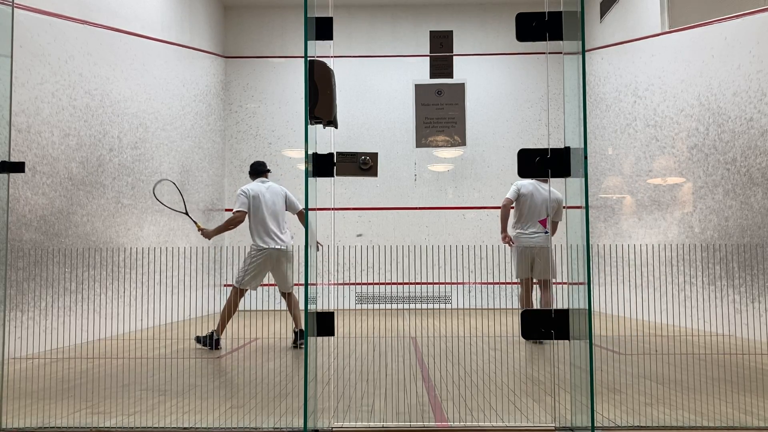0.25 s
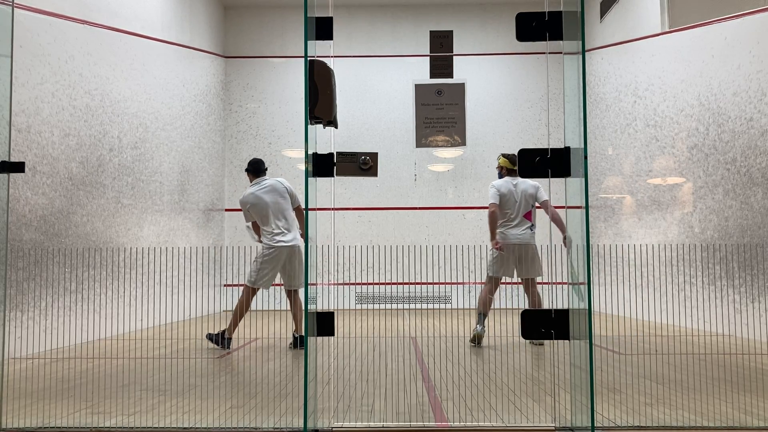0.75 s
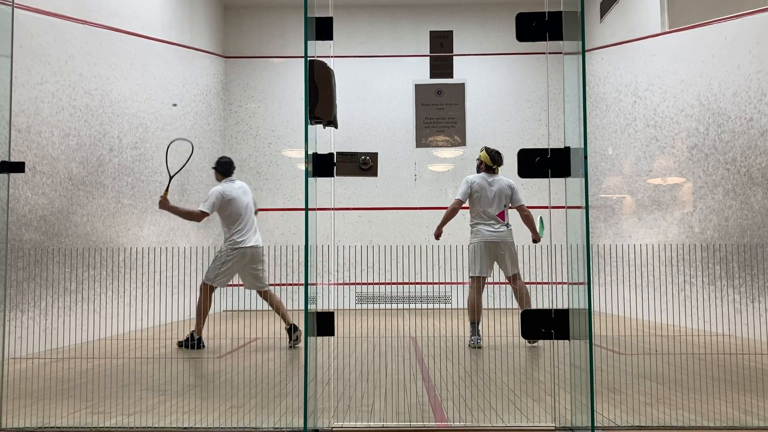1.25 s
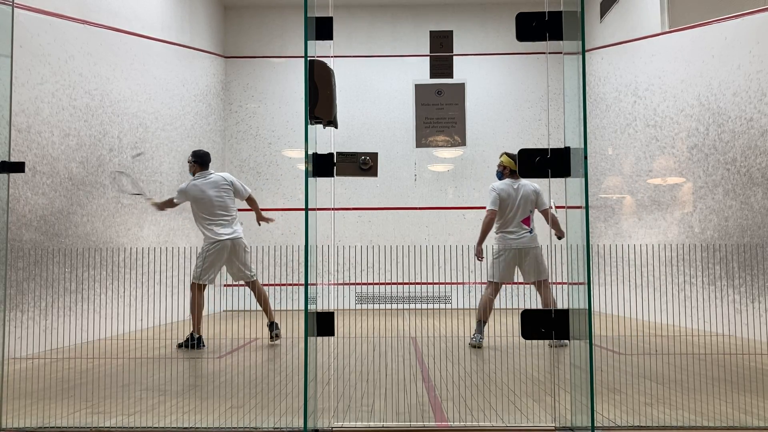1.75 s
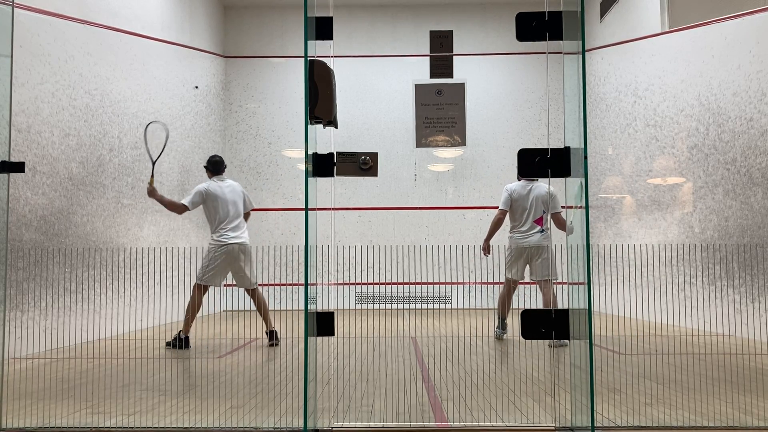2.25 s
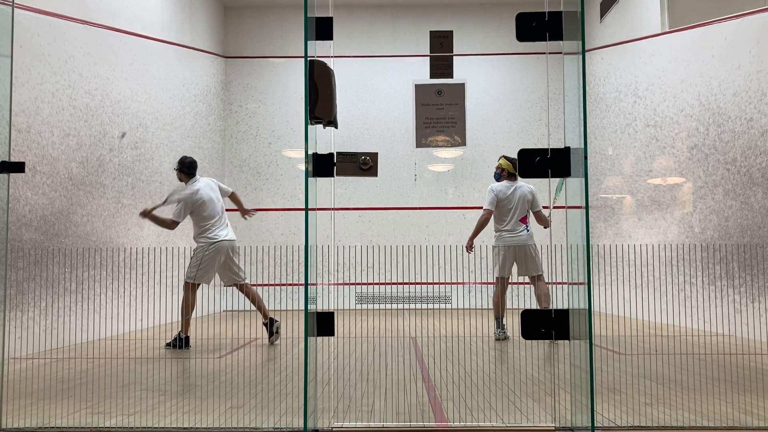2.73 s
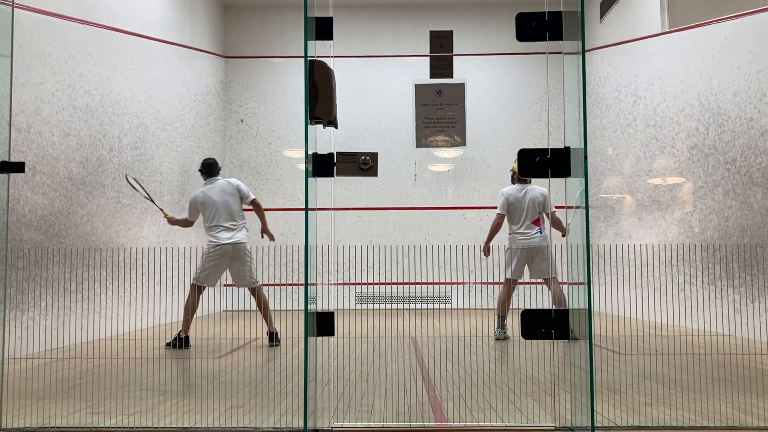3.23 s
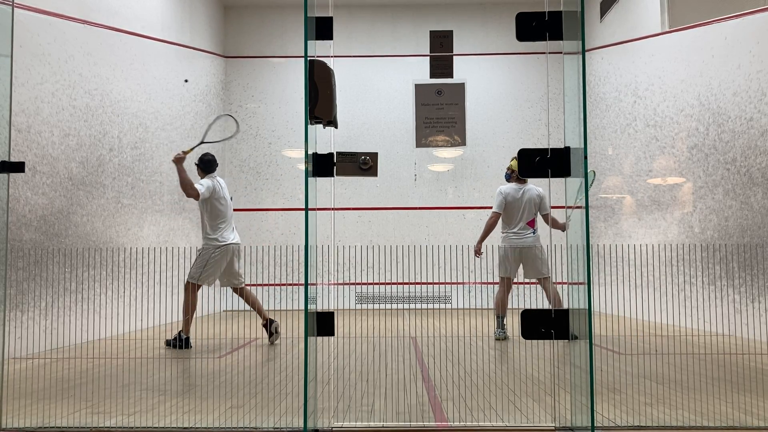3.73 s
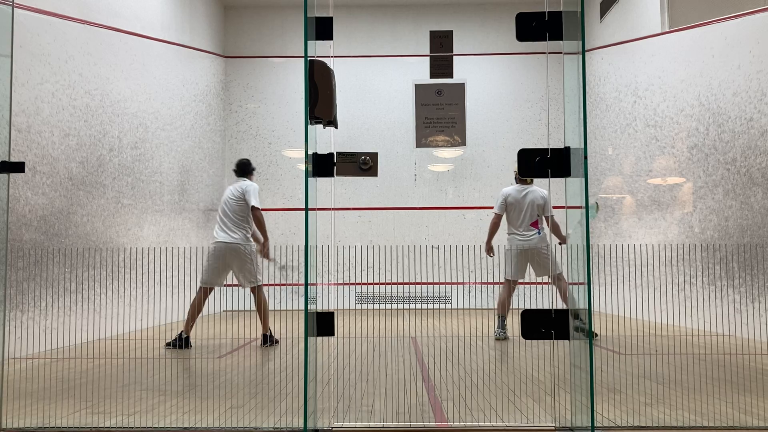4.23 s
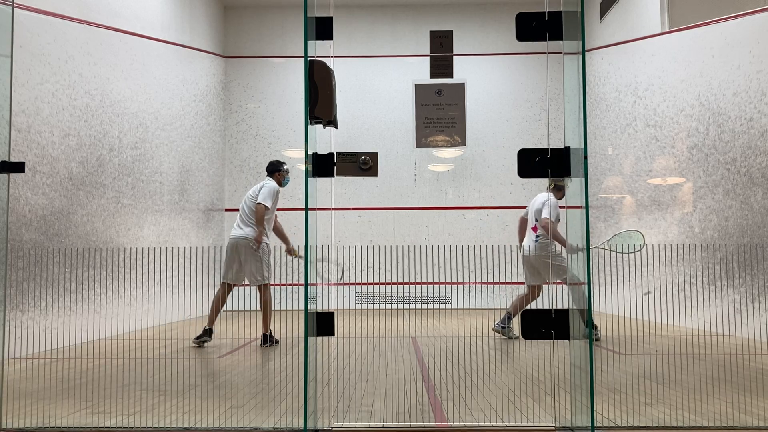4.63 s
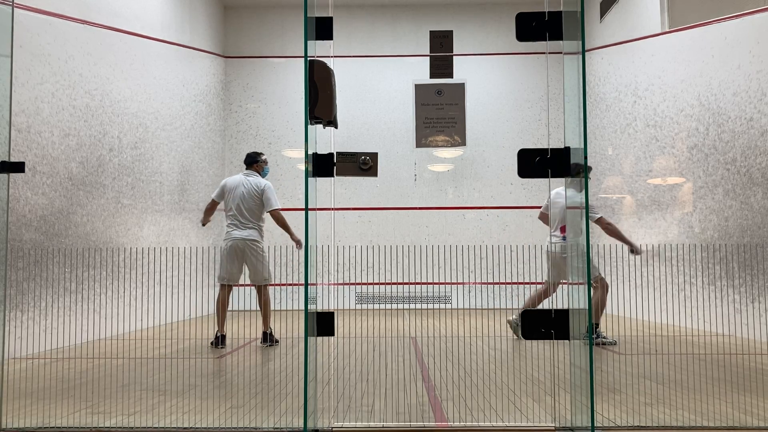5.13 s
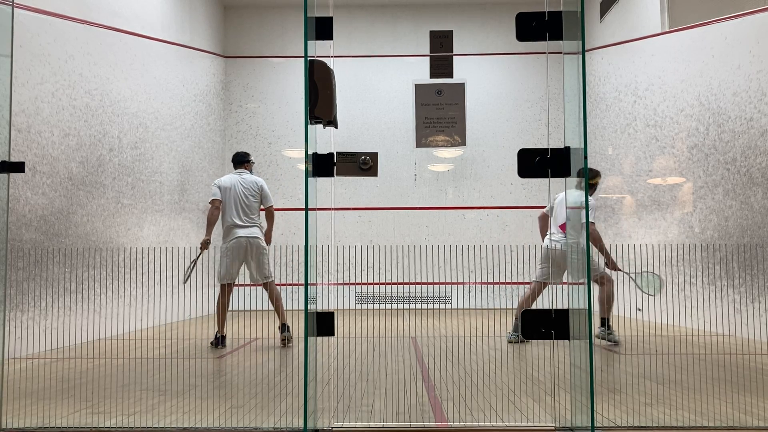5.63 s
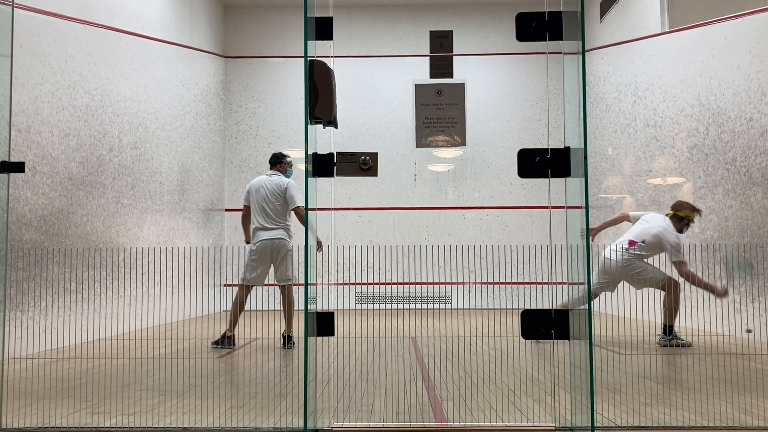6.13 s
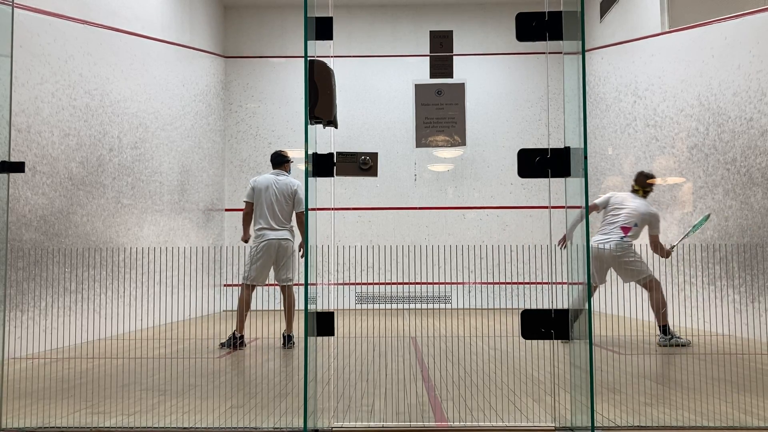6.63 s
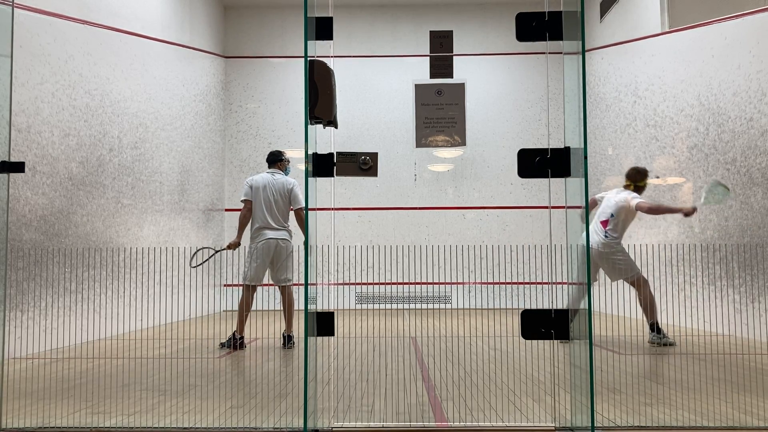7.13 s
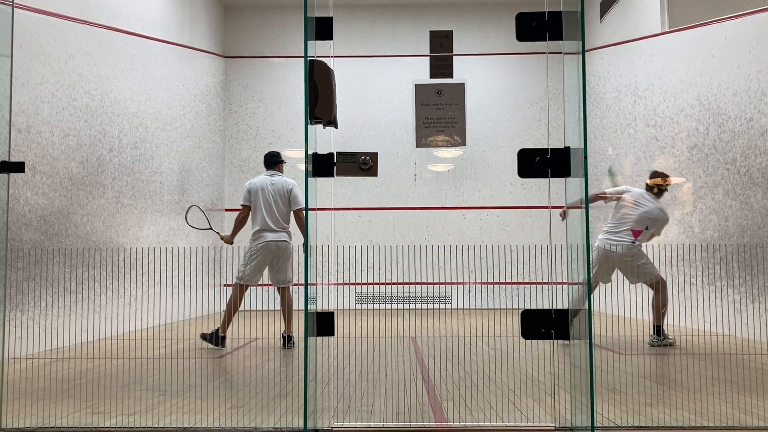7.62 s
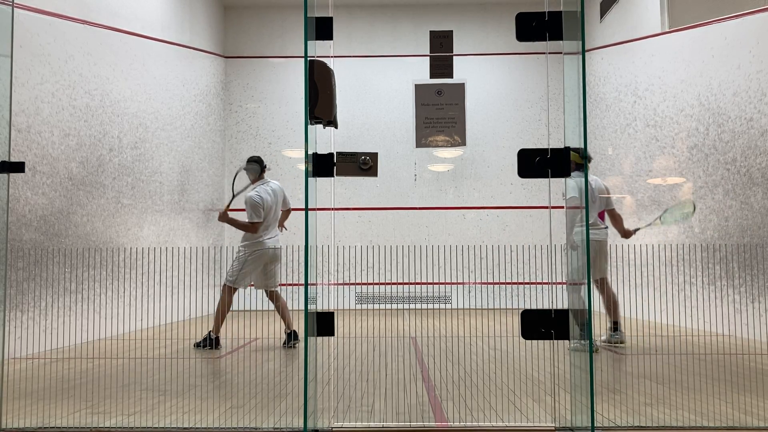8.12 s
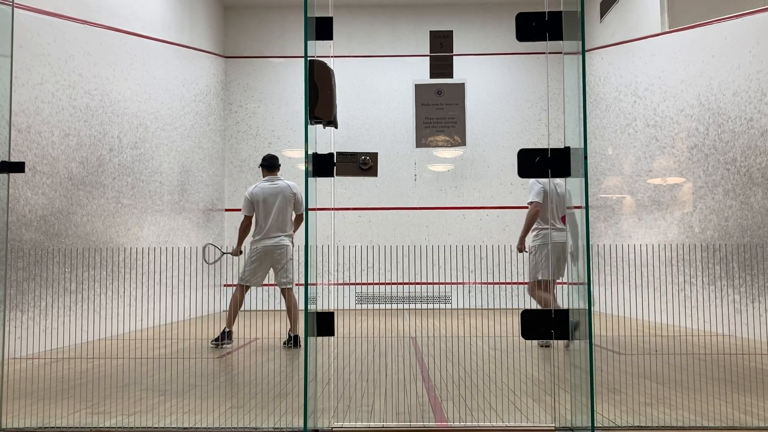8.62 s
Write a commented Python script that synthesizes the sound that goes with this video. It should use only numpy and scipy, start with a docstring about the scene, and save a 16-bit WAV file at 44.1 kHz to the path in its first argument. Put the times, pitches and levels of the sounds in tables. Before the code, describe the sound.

Two players warm up in a reverberant squash court, racquet slaps answered by hollow ball pops off the front wall, one shot booming into the metal tin.

```python
"""Squash court, heard from behind the glass back wall, as two players warm up.
Coloured clicks through a simulated court echo make each racquet stroke and the ball's answer on the
front wall; one low drive crashes into the tin with a thump, a boom and a rattle.
Strings linger as wavering tones; shaped noise and gliding tones are the swishes, scuffs and squeaks.
The bare court rings after every blow, and ventilation hums underneath as filtered noise and tones."""
import sys
import numpy as np
from scipy import signal
from scipy.fft import rfft, irfft, next_fast_len
from scipy.io import wavfile
from scipy.ndimage import uniform_filter1d

SR = 44100
rng = np.random.default_rng(int(sys.argv[2]) if len(sys.argv) > 2 else 0)


def bounce(signal):
    """Save signal as a 16-bit WAV file at the path given by the first command-line argument."""
    frames = np.transpose(np.atleast_2d(signal))
    limited = np.clip(frames, -1, 1)
    pcm = np.round(limited * 32767).astype(np.int16)
    wavfile.write(sys.argv[1], SR, pcm)


N = 391149
SIZE = 2 ** 17  # FFT length of one event [samples]
HZ, T = np.fft.rfftfreq(SIZE, 1 / SR), np.arange(SIZE) / SR

# racquet strokes: (time [s], level [dB], force [0-1], crack of first arrivals [dB],
# hollow knock of first arrivals [dB], string pitch [Hz], string ping [dB], lingering string ring [dB],
# delay of front wall echo [s])
STROKES = [(-.09, -9, 0.95, 9, 0, 1462, -1, -31, .042),
           (.640, -13.5, 0.43, 17.5, 10.5, 1295, 5, -43, 0.053),
           (1.794, -12.5, 0.26, -2, -19, 1260, 3.5, -45, 0.039),
           (2.999, -11.5, 0.23, 4.5, 10, 1280, 4.5, -44, 0.041),
           (4.127, -9, 0.71, -7, 11, 1264, 1, -48, .047),
           (5.212, -8.5, 0.94, 7, -1.5, 1430, -0.5, -37, 0.038),
           (6.318, -11, 0.051, 18.5, -4, 1440, 5, -46, .04),
           (7.522, -11, 0.92, 14.5, 5.5, 1460, 0, -39, .04),
           (8.322, -13.5, 0.27, 0, 10, 1266, 5, -41.5, 0.047)]
# resonances of the hollow ball: (frequency [Hz], width [Hz], lift [dB])
BALL_MODES = [(788, 63, -0.5), (1030, 102, 0), (2120, 80, -9.5)]
# spectrum of a gentle ball impact: (frequency [Hz], level [dB])
WALL_SOFT = [(60, -13), (180, -3.5), (300, -0.5), (440, -6), (620, -23), (900, -18.5), (1250, -17.5),
             (1650, -18), (2500, -27.5), (4000, -30), (6200, -37.5), (9500, -36), (13000, -43),
             (16000, -46.5)]
# first arrivals from mid-court: (delay [s], level [dB])
MID_PATHS = [(.0008, 21), (.004, 23), (.009, 13.5)]


def amp(db):
    """Decibels to gain."""
    return 10 ** (np.asarray(db) / 20)


def evened(x):
    """Scales to rms 1."""
    return x / np.sqrt(np.mean(x ** 2) + 1e-20)


def smoothed_noise(shape, first, second):
    """Gaussian noise averaged twice along its last axis."""
    once = uniform_filter1d(rng.standard_normal(shape), size=first)
    return uniform_filter1d(once, size=second)


def read(points, hz):
    """Joins (Hz, value) points on a log-frequency axis."""
    f, value = np.transpose(points)
    return np.interp(np.log(hz + 1), np.log(f + 1), value)


def add(mix, s, sound):
    """Mixes a stereo sound in at time s, which may lie before the start."""
    start = round(s * SR)
    sound = sound[:, max(-start, 0):]
    part = mix[:, max(start, 0):][:, :sound.shape[1]]
    part += sound[:, :part.shape[1]]


def treble(corner_hz=2500):
    """A shelf that rises from 0 in the bass to 1 in the treble."""
    return HZ ** 2 / (HZ ** 2 + corner_hz ** 2)


def blow(db, modes=()):
    """Spectrum of a causal (minimum-phase) click of the given colour, ringing in the given modes."""
    cepstrum = irfft(np.log(amp(db)))
    fold = 1 + np.sign(SIZE / 2 - np.arange(SIZE)) * (T > 0)
    click = np.exp(rfft(cepstrum * fold))
    ring = sum(amp(lift) / (1 + 2j * (HZ - hz) / width) for hz, width, lift in modes)
    return click * (1 + ring)


def court_tail(rise_s, hold_s, grain_db):
    """Reverberant noise that builds up, holds, then dies by band, uneven from beats and bunched echoes."""
    # decay of the court: (frequency [Hz], t60 [s])
    decay_times = [(80, 0.54), (160, 1.63), (240, 1.5), (500, 1.78), (900, 2.02), (1400, 2.09),
                   (2000, 1.375), (2800, 1.19), (4000, 1.085), (5500, 0.8), (7700, 0.69), (11000, 0.55),
                   (16000, 0.46)]
    beating_db, cluster_db = 2.6, 1.0
    t = T[:2 * SR]
    clusters = evened(uniform_filter1d(rng.standard_normal(len(t)), size=180))
    grain = amp(grain_db * rng.standard_normal(len(t)) + cluster_db * clusters)
    taps = evened(rng.standard_normal((2, len(t))) * grain)
    hz, when, z = signal.stft(taps, SR, nperseg=512)
    # above the bass, narrow resonances swell and fade between the parallel walls
    across_bands = uniform_filter1d(rng.standard_normal(z.shape[1:]), size=2, axis=0)
    beats = evened(uniform_filter1d(across_bands, size=7, axis=1))
    beats_db = beating_db * (np.clip(beats, -2, 2) - .4) * np.minimum(hz / 1400, 1)[:, None]
    # level holds while the sound first crosses the court
    decay_db = -60 * np.maximum(when - hold_s, 0) / read(decay_times, hz)[:, None]
    tail = signal.istft(z * amp(decay_db + beats_db), SR, nperseg=512)[1][:, :len(t)]
    return tail * (1 - np.exp(-t / rise_s))


def first_arrivals(paths, length, smear_s, solid):
    """Each arrival is a spike (solid: its ratio to the rest) and a noise burst, smeared by the glass."""
    first, brief = np.zeros((2, length)), T[:SR // 20]
    for delay, db in paths:
        arrival = rng.standard_normal((2, len(brief))) * np.exp(-brief / smear_s)
        spot = rng.choice(SR // 2000, size=2, replace=False)
        sign = rng.choice([-1, 1], size=2)
        arrival[[0, 1], spot] += solid * np.linalg.norm(arrival, axis=1) * sign
        add(first, delay, amp(db) * arrival / np.linalg.norm(arrival, axis=1, keepdims=True))
    return first


def court(paths, crack_db, knock_db=0, knock_hz=920, smear_s=0.0012, solid=0.26, rise_s=0.0023,
          hold_s=0.024, grain_db=3.):
    """One place's echo spectrum: coloured first arrivals plus the reverberant tail."""
    # colour of first arrivals against the tail, whose bass builds up late: (frequency [Hz], level [dB])
    first_colour = [(150, -1.5), (270, -5), (450, -2.5), (900, -1), (2000, 1.5), (4000, 1), (5400, -2.5),
                    (7000, 2.5), (8500, -1), (12000, 1)]
    tail = court_tail(rise_s, hold_s, grain_db)
    first = first_arrivals(paths, tail.shape[1], smear_s, solid)
    # a square blow arrives with a hollow knock, one that faces the microphone with a brighter crack
    knock = knock_db / (1 + ((HZ - knock_hz) / (0.19 * knock_hz)) ** 2)
    colour_db = read(first_colour, HZ) + knock + crack_db * treble(4400)
    return rfft(tail, SIZE) + rfft(first, SIZE) * amp(colour_db)


def ports(z, hz, lag_s=0.0002197, knee_hz=2300):
    """Two unrelated spectra become the microphone pair: alike in the bass, offset in phase in the treble."""
    # likeness of the two ports: (frequency [Hz], correlation [-1 to 1])
    likeness = [(120, .998), (260, 0.9), (400, 0.54), (560, -0.15), (850, 0.77), (1200, 0.17),
                (2200, -0.088), (4000, -0.3), (5900, 0.49), (6900, 1), (9200, 1), (12500, 1), (16000, .85)]
    same = np.clip(read(likeness, hz), -1, 1)
    turn = np.exp(2j * np.pi * lag_s * np.maximum(hz - knee_hz, 0))
    return np.array([z[0], turn * (same * z[0] + np.sqrt(1 - same ** 2) * z[1])])


def heard(z):
    """A spectrum as two seconds of stereo; the right port takes more bass, the left more midrange."""
    lean_db = read([(150, -2.5), (400, 0.7), (1000, 1.2), (2200, 3.0), (6000, -0.2)], HZ)
    return irfft(ports(z, HZ) * amp(np.array([lean_db, -lean_db]) / 2))[:, :2 * SR]


def racquets(treble_db=-3.5, treble_per_crack=0.14):
    """The strings slap the ball and ping briefly; a harder stroke is brighter."""
    # spectra of a gentle and of a hard stroke: (frequency [Hz], level [dB])
    racquet_soft = [(60, -10), (170, -9.5), (280, 0.5), (450, -8), (620, -23.5), (870, -14.5), (1100, -17),
                    (1600, -27.5), (2300, -30), (3600, -30.5), (6000, -36), (9500, -31.5), (13000, -38.5),
                    (16000, -54)]
    racquet_hard = [(60, -12.5), (140, -3), (300, -2), (490, -5), (620, -21.5), (860, -0.5), (1150, -11.5),
                    (1500, -5), (1900, -14.5), (3500, -16.5), (6000, -24.5), (9500, -24), (13000, -34),
                    (16000, -43)]
    # modes of the string bed: (ratio to string pitch, width [Hz], lift [dB])
    string_modes = [(1, 24.1, -1.5), (2.19, 89.2, -8.5), (3.1, 200, -12.5)]
    # echo cluster off the front wall: (delay after its first arrival [s], level [dB])
    front_echo = [(0, 15), (.007, 13), (.016, 11.5)]
    out, soft, hard = np.zeros((2, N)), read(racquet_soft, HZ), read(racquet_hard, HZ)
    for s, db, force, crack_db, knock_db, string_hz, ping_db, _, echo_s in STROKES:
        shelf_db = (treble_db + treble_per_crack * crack_db) * treble()
        colour = soft + force * (hard - soft) + shelf_db
        modes = [(ratio * string_hz, width, ping_db + lift) for ratio, width, lift in string_modes]
        slap = blow(db + colour, modes)
        paths = MID_PATHS + [(echo_s + delay, level) for delay, level in front_echo]
        echoes = court(paths, crack_db, knock_db, smear_s=0.0015, rise_s=0.005, hold_s=0.051)
        add(out, s, heard(slap * echoes))
    return out


def front_wall(force_treble_db=-3.0):
    """The hollow ball flattens on the plaster and pops: a slow ball knocks, a fast one cracks."""
    # ball on front wall: (time [s], level [dB], force [0-1], knock [dB], knock pitch [Hz],
    # ball mode tuning [ratio], crack [dB], slap-back delay [s], slap-back level [dB])
    wall_hits = [(0.0737, -3, 0.99, 9.7, 870, 1.02, 4, 0.082, 17.4),
                 (.920, -8.5, 0.23, 6.5, 1380, 1.1, 2.5, .064, 20),
                 (2.103, -8, 0, 9.2, 900, 0.96, -2.5, 0.06, 20),
                 (3.328, -11, 0.1, 5, 1900, 0.99, 0.5, 0.074, 18),
                 (4.288, -2.5, 0.76, 7.3, 870, 1.02, 0, 0.077, 20),
                 (6.663, -10.5, 0.18, 9.9, 1050, 1.03, 0, .072, 22),
                 (7.700, -3.5, 0.71, 6.5, 950, .99, 3.5, 0.061, 19.4),
                 (8.689, -11.3, 0, 9.7, 1190, 1.13, -6, 0.076, 18)]
    # spectrum of a hard impact: (frequency [Hz], level [dB])
    wall_hard = [(60, -12), (110, -2.5), (200, -8), (420, -4.5), (620, -12), (880, -5.5), (1200, -18.5),
                 (2100, -9), (2900, -17.5), (4000, -19.5), (6200, -26), (9800, -25.5), (13000, -30),
                 (16000, -42.5)]
    # first arrivals from the front wall: (delay [s], level [dB])
    front_paths = [(.0012, 22.5), (.0044, 24.5), (.008, 23.5), (.013, 17.5), (.023, 15)]
    # slap-back cluster off the other walls: (delay after its first arrival [s], relative level [dB])
    slap_back = [(0, -0.5), (.004, -3.5), (.011, -2)]
    out, soft, hard = np.zeros((2, N)), read(WALL_SOFT, HZ), read(wall_hard, HZ)
    for s, db, force, knock_db, knock_hz, tune, crack_db, slap_s, slap_db in wall_hits:
        modes = [(hz * tune, width, lift) for hz, width, lift in BALL_MODES]
        pop = blow(db + soft + force * (hard - soft + force_treble_db * treble()), modes)
        paths = front_paths + [(slap_s + delay, slap_db + level) for delay, level in slap_back]
        echoes = court(paths, crack_db, knock_db, knock_hz, smear_s=.0007, solid=0.8,
                       rise_s=0.0022, hold_s=0.042)
        add(out, s, heard(pop * echoes))
    return out


def tin(s=5.3625, boom_db=2.5, rattle_db=-12.5, thump_s=.036, thump_db=-12.5):
    """The sheet-metal strip caves in with a thump, booms, then swells into a bright rattle on its frame."""
    # spectra of boom and rattle: (frequency [Hz], level [dB])
    tin_boom = [(30, -31), (60, -14), (85, -2.5), (130, -8.5), (270, -2.5), (380, -5), (480, -4),
                (650, -12.5), (850, -7), (1300, -24), (2200, -18.5), (4000, -23.5), (6500, -32),
                (16000, -34)]
    tin_rattle = [(300, -26), (1000, 5), (1700, 3), (2600, 1.5), (3500, 1.5), (6000, -3.5), (9800, 1),
                  (13000, -5), (16000, -11.5)]
    # resonances of the sheet: (frequency [Hz], width [Hz], lift [dB])
    tin_modes = [(115, 36, 2.5), (252.6, 26, 0.5), (178, 22, 3), (820.5, 16, 4), (1450, 20, 2.5),
                 (2250, 50, 3)]
    # first arrivals from the tin: (delay [s], level [dB])
    tin_paths = [(.003, 22.66), (.008, 27.6), (.015, 28), (.022, 27.6)]
    # slaps on the frame as the sheet springs back: (delay [s], level [dB])
    tin_slaps = [(.0095, 28.5), (.021, 27), (.031, 25.5), (.046, 25)]
    flex = np.sin(np.pi * np.minimum(T / thump_s, 1))
    thump = amp(thump_db) * flex * sum(np.sin(2 * np.pi * hz * T) for hz, _, _ in tin_modes[:2])
    boom_echoes = court(tin_paths, 0.87, smear_s=0.0018, hold_s=0.035)
    boom = blow(boom_db + read(tin_boom, HZ), tin_modes) * boom_echoes
    rattle_echoes = court(tin_slaps, -15.5, smear_s=.004, rise_s=0.029, hold_s=0.029)
    rattle = blow(rattle_db + read(tin_rattle, HZ)) * rattle_echoes
    out = np.zeros((2, N))
    add(out, s, heard(boom + rattle) + thump[:2 * SR])
    return out


def strings(swell_s=0.037, t60_s=0.88, waver=0.85):
    """The string bed's note lingers after the slap, swelling and wavering as its echoes overlap."""
    out, t = np.zeros((2, N)), T[:SR]
    envelope = (1 - np.exp(-t / swell_s)) * amp(-60 * t / t60_s)
    for s, *_, string_hz, _, ring_db, _ in STROKES:
        echoes = waver * evened(smoothed_noise((2, 2, SR), 1100, 700))
        note = (1 + echoes[0] + 1j * echoes[1]) * np.exp(2j * np.pi * string_hz * t)
        add(out, s, amp(ring_db) * envelope * evened(note.real))
    return out


def swings(length_s=0.045, full_db=-49.0, force_db=37.5, crack_db=14.0):
    """Air rushes through the strings as the racquet gathers pace; a weak stroke swishes far more softly."""
    # spectrum of the swish: (frequency [Hz], level [dB])
    swish_colour = [(100, 11.5), (500, 16), (1500, 11), (4000, 4.5), (7000, -3), (10000, -3.5),
                    (16000, -22.5)]
    out, pace = np.zeros((2, N)), T / length_s * (T < length_s)
    for s, _, force, *_ in STROKES:
        air = pace * rng.standard_normal(SIZE)
        colour = full_db - force_db * (1 - force) + read(swish_colour, HZ)
        swish = blow(colour) * rfft(air / np.linalg.norm(air))
        add(out, s - length_s, heard(swish * court(MID_PATHS, crack_db, hold_s=.01)))
    return out


def bounces(tap_treble_db=3.5, tap_crack_db=9.5):
    """The ball taps lightly on the floor, ringing in its own modes."""
    # ball on floor: (time [s], level [dB])
    floor_hits = [(4.975, -24.5), (6.031, -26.5)]
    out = np.zeros((2, N))
    for s, db in floor_hits:
        tap = blow(db + read(WALL_SOFT, HZ) + tap_treble_db * treble(), BALL_MODES)
        add(out, s, heard(tap * court(MID_PATHS, tap_crack_db)))
    return out


def grip(length_s, chatter_db=5):
    """Pressure of a sliding sole: one arch, broken up as the rubber sticks and slips."""
    chatter = evened(uniform_filter1d(rng.standard_normal(SIZE), size=300))
    return np.sin(np.pi * np.minimum(T / length_s, 1)) * amp(chatter_db * chatter)


def scuffs():
    """Rubber soles slide with a rough grip: chattering noise in the colour and modes of the sole."""
    # shoe scuffs: (time [s], length [s], level [dB])
    slides = [(0.56, 0.034, -52), (0.68, 0.028, -48.5), (1.657, 0.049, -58), (2.829, 0.097, -57.5),
              (3.771, 0.037, -71), (6.234, 0.025, -59.5), (7.389, 0.028, -65)]
    # spectrum of the sole: (frequency [Hz], level [dB])
    sole_colour = [(100, 11.5), (500, 19), (1500, 14.5), (4000, -1.5), (7000, -7), (10000, -4.5),
                   (16000, -22)]
    # resonances of the sole: (frequency [Hz], width [Hz], lift [dB])
    sole_modes = [(3830, 250, 2), (4270, 160, -3.5)]
    out = np.zeros((2, N))
    sole, echoes = blow(read(sole_colour, HZ), sole_modes), court(MID_PATHS, 3.7, hold_s=.01)
    for s, length_s, db in slides:
        slips = grip(length_s) * rng.standard_normal(SIZE)
        add(out, s, heard(amp(db) * sole * rfft(slips / np.linalg.norm(slips)) * echoes))
    return out


def squeaks(direct_db=32, jitter=.022):
    """A sole that grips sings a gliding tone, its pitch jittered (as a share) by uneven grip."""
    # shoe squeaks: (time [s], length [s], level [dB], pitch [Hz], glide [share of pitch])
    chirps = [(.586, .02, -58.5, 4380, -.13), (2.84, .11, -76, 6780, 0), (2.845, .1, -70, 4050, .12)]
    out = np.zeros((2, N))
    for s, length_s, db, squeak_hz, glide in chirps:
        slide = np.minimum(T / length_s, 1)
        waver = jitter * evened(uniform_filter1d(rng.standard_normal(SIZE), size=70))
        pitch_hz = squeak_hz * (1 + glide * (slide - .5) + waver)
        squeak = grip(length_s) * np.sin(2 * np.pi * np.cumsum(pitch_hz) / SR)
        # direct sound stands out of its echoes
        echoes = court(MID_PATHS[:1], direct_db)
        add(out, s, heard(amp(db) * rfft(squeak / np.linalg.norm(squeak)) * echoes))
    return out


def ringing(x, uneven_db=2.1, count=91):
    """The closed court favours a few hollow tones, among many weaker ones that ring on unevenly."""
    # resonances of the court: (frequency [Hz], width [Hz], lift [dB])
    court_modes = [(814, 12, -9), (865, 7.3, -8.5), (910, 9, -8), (977, 14, -8.5), (1388, 12, -4),
                   (2190, 16, -3), (2680, 22, -7), (2960, 24, -6.5)]
    ripple = np.tanh(evened(smoothed_noise(len(HZ), count, count)))
    response = irfft(blow(uneven_db * ripple * treble(460), court_modes))[:SR // 2]
    return signal.oaconvolve(x, response[None], axes=1)[:, :N]


def ventilation(rumble_db=-39.5, pan_db=-2.5):
    """Duct rumble with a few fan tones, each a steady line with some wavering around it."""
    # spectrum of the rumble: (frequency [Hz], level [dB])
    rumble_colour = [(20, -11.5), (42, -8.5), (60, 9), (100, -0.5), (160, -2), (220, -2.5), (300, -5.5),
                     (420, -14.5), (600, -21.5), (1200, -27.5), (2500, -36), (5000, -52.5), (10000, -58),
                     (16000, -61)]
    # fan tones: (frequency [Hz], width [Hz], rms level before pan [dB], waver [ratio to steady line])
    fan_tones = [(79.8, 6.3, -39, 0.77), (119.5, 8.4, -42, 2.2), (165.3, 7, -54.5, 1.5),
                 (215, 10, -51.5, 0.61), (234.2, 6, -51, 0.98), (347, 5.8, -60, 0.89)]
    size = next_fast_len(N)
    hz, t = np.fft.rfftfreq(size, 1 / SR), np.arange(size) / SR
    air = ports(rfft(rng.standard_normal((2, size))), hz)
    out = amp(rumble_db) * evened(irfft(air * amp(read(rumble_colour, hz)), size))
    for tone_hz, width, db, waver in fan_tones:
        band = rfft(rng.standard_normal(size)) / (1 + (2 * (hz - tone_hz) / width) ** 2)
        line = np.sin(2 * np.pi * (tone_hz * t + rng.random()))
        out = out + amp(db) * evened(evened(line) + waver * evened(irfft(band, size)))
    return out[:, :N] * amp([[pan_db / 2], [-pan_db / 2]])


def scene():
    """Blows, swishes and shoes ring in the court; lingering strings and ventilation are added after."""
    struck = racquets() + front_wall() + tin()
    light = swings() + bounces() + scuffs() + squeaks()
    return ringing(struck + light) + strings() + ventilation()


def record(dry, low_hz=38, edge_hz=15900):
    """The microphone sheds the deepest bass, the highest peaks round off, then the band limit."""
    wet = signal.sosfilt(signal.butter(2, low_hz, "high", fs=SR, output="sos"), dry)
    wet = wet / (1 + (wet / .93) ** 6) ** (1 / 6)
    band_limit = signal.firwin(511, edge_hz, window=("kaiser", 9), fs=SR)
    return signal.oaconvolve(wet, band_limit[None], "same")


dry = scene()
out = record(dry)
bounce(out)
```